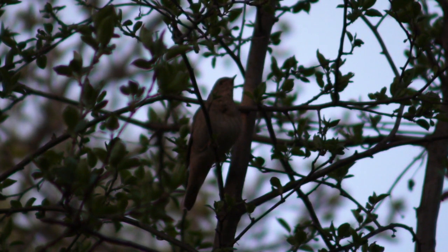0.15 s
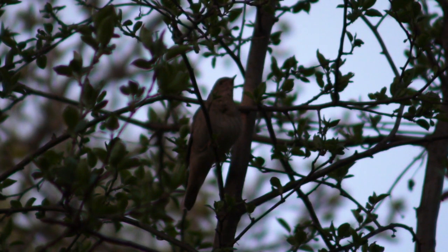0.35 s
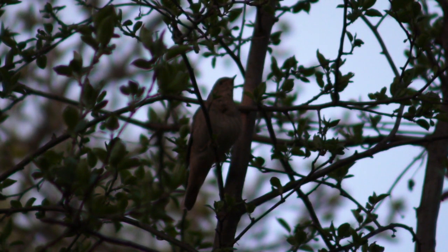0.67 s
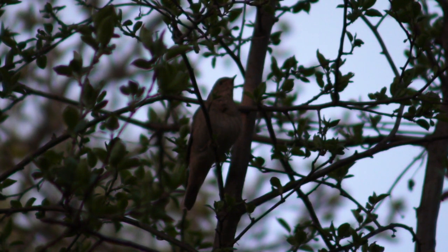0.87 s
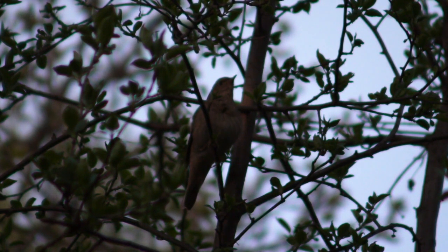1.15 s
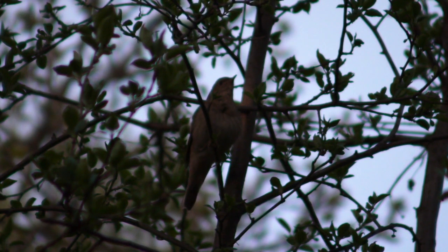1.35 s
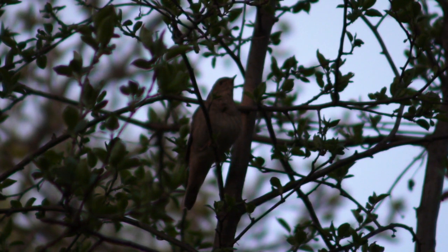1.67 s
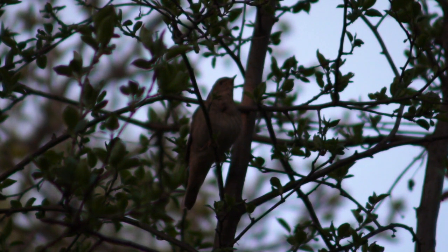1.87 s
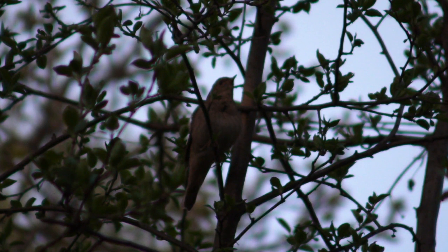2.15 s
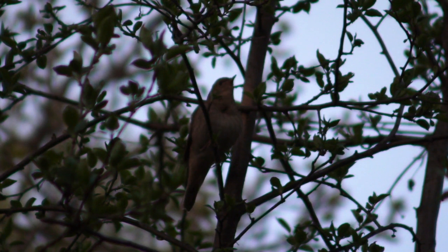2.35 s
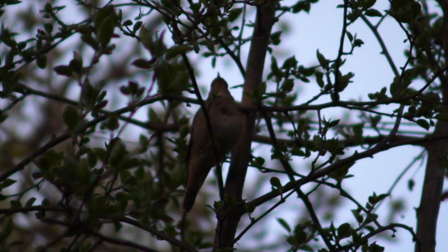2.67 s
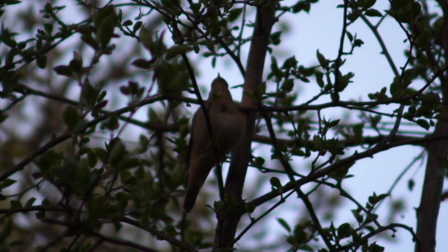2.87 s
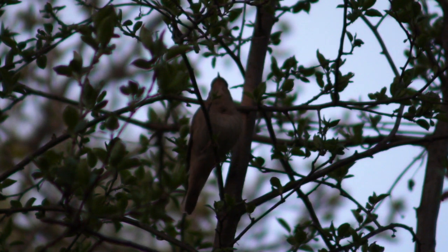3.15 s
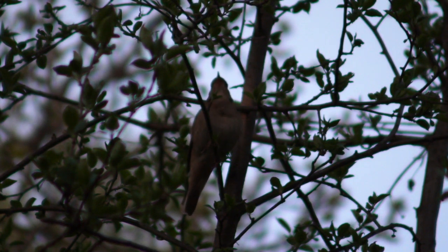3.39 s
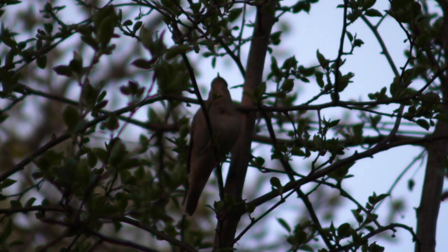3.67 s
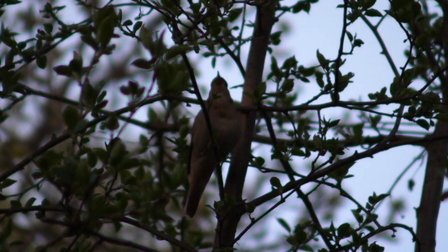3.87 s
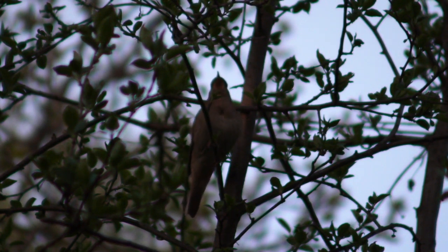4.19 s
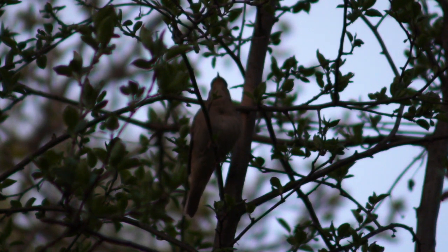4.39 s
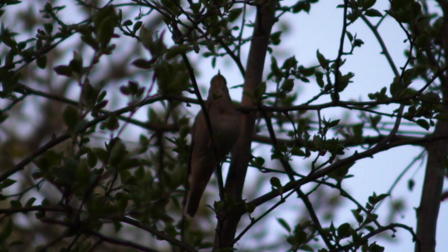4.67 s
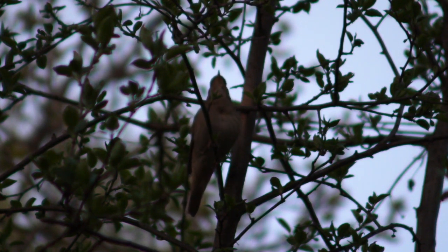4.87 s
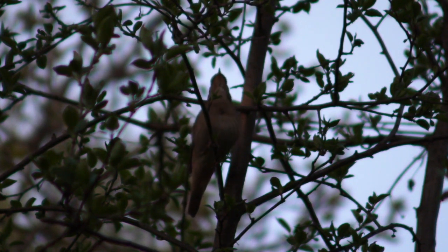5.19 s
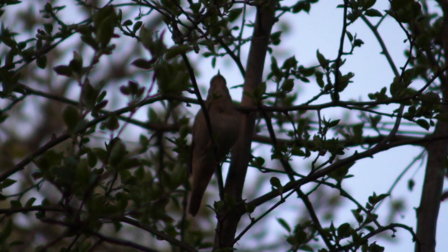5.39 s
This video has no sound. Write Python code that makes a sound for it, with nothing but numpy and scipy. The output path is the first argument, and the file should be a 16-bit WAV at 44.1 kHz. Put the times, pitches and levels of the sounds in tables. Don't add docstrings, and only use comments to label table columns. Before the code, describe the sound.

A continuous low road rumble, with soft wavering engine hums and slight tyre hiss, lies under an outdoor scene among leaves, growing slightly over five and a half seconds. For the first 2.4 seconds only distant birds are heard: faint scratchy chirps at the start and around 1.4, thin high ticking calls, and a hazy slurred, warbling song from 1.6. At 2.4 a close nightingale gives a short falling chip. Clear whistles around 3.2 kHz swell in at 2.7, 3.3 and 3.9, each bolder; the third is longest, briefly trembling before trailing off. Very quick sweeps from about 7 kHz down to 3 kHz follow at 3.0, 3.6 and 4.3. Then rich throbbing low notes near 1.9 kHz come in pairs at 4.6 and 5.1, capped by loud sweeps at 4.9 and 5.4. Every note has close leafy echoes and a short diffuse tail; loud notes duck the background.

```python
import sys
import numpy as np
from scipy import signal
from scipy.fft import rfft, irfft, next_fast_len
from scipy.io import wavfile
from scipy.ndimage import uniform_filter1d

SR = 44100
rng = np.random.default_rng(int(sys.argv[2]) if len(sys.argv) > 2 else 0)


def store_pcm(level_fs):
    pcm = np.round(np.clip(level_fs, -1, 1) * 32767).astype(np.int16)
    wavfile.write(sys.argv[1], SR, np.atleast_2d(pcm).T)


def volts_from_decibels(level):
    exponent = np.asarray(level, float) / 20
    return 10 ** exponent


N = 244314


def rms_one(x):
    return x / np.sqrt(np.mean(x ** 2) + 1e-20)


def at_hz(points, hz):
    points = np.array(points)
    return np.interp(np.log(hz + 1), np.log(points[:, 0]), points[:, 1])


def drift(rate):
    r = np.exp(-80 * np.pi * rate / SR)
    noise = rng.standard_normal(N // 40 + 2002)
    slow = signal.lfilter([1], [1, -2 * r, r * r], noise)[2000:]
    return np.interp(np.arange(N) / 40, np.arange(len(slow)), rms_one(slow))


# (start [s], stop [s], rate [1/s], pitch swing [Hz], level swing [dB])
WHISTLE_SHAKE = (4.025, 4.13, 66, 22, 8.4)
# (frequency [Hz], gain [dB])
BEAK_RESONANCE = [(3500, 5), (6500, -4.5), (8000, -6), (10500, 6), (12500, -7), (14500, -20.5),
                  (16000, -22)]


def sing(out, rows, tones, edge_s=0.00094, waver=np.zeros(N), steady=0):
    s, hz, level_db = np.transpose(rows)
    at = np.arange(int(max(s[0], 0) * SR), min(int(s[-1] * SR), N))
    t = at / SR
    start, stop, rate, swing_hz, swing_db = WHISTLE_SHAKE
    shake_depth = np.clip(np.minimum(t - start, stop - t) / 0.041, 0, 1)
    shake = np.sin(2 * np.pi * rate * (t - start)) * shake_depth

    pitch = uniform_filter1d(np.interp(t, s, hz), size=90)
    pitch = pitch * (1 + waver[at]) + swing_hz * shake
    phase = 2 * np.pi * np.cumsum(pitch) / SR
    level = uniform_filter1d(np.interp(t, s, level_db), size=260) + swing_db * shake

    wave = np.sin(phase)
    for k, db in tones:
        overtone_db = db + at_hz(BEAK_RESONANCE, k * pitch) + steady * (level.max() - level)
        audible = k * pitch < .45 * SR
        wave += volts_from_decibels(overtone_db) * np.sin(k * phase) * audible
    soft_ends = np.clip(np.minimum(t - s[0], s[-1] - t) / edge_s, 0, 1)
    out[at] += np.sqrt(2) * volts_from_decibels(level) * soft_ends * wave


def whistle(db, on, opens, lets_go, end, hz):
    lead_in_s, lead_in_db = 0.064, -48
    voice_on_s, voice_on_db = .018, -20
    soft_gain_db = 2
    open_s, open_db = .018, -3.5
    fade_db_per_s, cut_s, cut_db = 148, 0.0034, 9
    linger_db, linger_db_per_s = -20, 57
    glide_hz, glide_s = 205, 0.05
    sag_hz_per_db, sag_from_db = 14, -13

    t = np.arange(on - voice_on_s - lead_in_s, end + cut_s, .002)
    swell = np.interp(t, [t[0], on - voice_on_s, on, opens, opens + open_s, lets_go],
                      [lead_in_db - 16, lead_in_db, voice_on_db, voice_on_db + soft_gain_db,
                       db + open_db, db])
    since = t - lets_go
    fade = np.maximum(db - fade_db_per_s * since, linger_db - linger_db_per_s * since)
    level = np.minimum(swell, fade) - cut_db * np.clip((t - end) / cut_s, 0, 1)
    effort_db = uniform_filter1d(np.maximum(level - sag_from_db, 0), size=15)
    pitch = hz + glide_hz * np.exp((on - t) / glide_s) - sag_hz_per_db * effort_db
    return np.c_[t, pitch, uniform_filter1d(level, size=5)]


def low_note(start, end, hz, first_db, last_db):
    throb_s, throb_db, last_throb_s = 0.0257, 9, 0.014
    droop_hz, droop_s = 200, .014
    shy_db, shy_s = 7.5, 0.022
    t = np.arange(start, end, .001)
    throb = np.sin(np.pi * (end - last_throb_s - t) / throb_s) ** 2
    pitch = hz - droop_hz * np.exp((t - end) / droop_s)
    level = np.interp(t, [start, end], [first_db, last_db])
    level = level - throb_db * throb - shy_db * np.exp((start - t) / shy_s)
    return np.c_[t, pitch, level]


def sweep(s, top, end, bend, db):
    start_hz, rise_s, fade_db = 4760, 0.0069, -5.5
    fall_s = 0.031 + (top - end) / 180000
    share = np.linspace(0, 1, 16)
    pitch = top - (top - end) * share ** bend
    falling = np.c_[s + rise_s + fall_s * share, pitch, db + fade_db * share ** 1.5]
    return np.r_[[(s, start_hz, db - 4.0)], falling]


# (frequency [Hz], gain [dB])
LEAF_REFLECTION = [(1800, -2), (3300, -5.5), (5000, 5), (8000, -4), (12000, 5.5)]
# (frequency [Hz], share of tail length [1])
AIR_ABSORPTION = [(2000, 1.0), (5000, 0.71), (8000, 0.58), (12000, 0.5)]


def haze(onset_s, t60):
    t, hz = np.arange(SR) / SR, np.arange(SR // 2 + 1)
    white = rfft(rng.standard_normal((2, SR))) * volts_from_decibels(at_hz(LEAF_REFLECTION, hz))
    tail, edges = 0, [0, 4000, 8000, 11000, SR]
    for low, high in zip(edges, edges[1:]):
        share = np.clip(at_hz(AIR_ABSORPTION, low + 1000), .2, 2)
        band = irfft(white * (hz >= low) * (hz < high), SR)
        tail = tail + band * volts_from_decibels(-60 * t / t60 / share)
    swell = 1 - np.exp(-t / onset_s)
    return tail * swell / np.sqrt(np.sum((swell * volts_from_decibels(-60 * t / t60)) ** 2))


# (onset [s], decay time t60 [s], energy [dB])
SCATTERED_TAILS = [
    (0.001, 0.297, 1.5),
    (0.065, 1.103, -14.5),
]
# (delay [ms], left level [dB], right level [dB])
CLOSE_ECHOES = [(.8, -44, -16.5), (2.4, -13.5, -11.5), (3.7, -2.5, -9), (5.4, -14, -36), (6.5, -6.5, -2.5),
                (8.1, 0, -33.5)]
# (frequency [Hz], left-right difference [dB])
HOUSING_SHADE = [(1800, 1.5), (3200, -0.5), (4500, -1), (7000, -5), (11000, -4)]


def thicket():
    response = sum(volts_from_decibels(db) * haze(onset_s, t60) for onset_s, t60, db in SCATTERED_TAILS)
    response[:, 0] += 1
    for ms, left_db, right_db in CLOSE_ECHOES:
        response[:, round(ms * SR / 1000)] += volts_from_decibels(np.array([left_db, right_db]))
    side_db = at_hz(HOUSING_SHADE, np.arange(129) * SR / 256)
    shade = np.roll(irfft(volts_from_decibels(np.outer([.5, -.5], side_db))), 128, axis=1)
    return signal.fftconvolve(response, shade, axes=1)[:, 128:]


def scatter(x, response):
    return signal.fftconvolve(x[None], response, axes=1)[:, :N]


# (voice on [s], opens [s], lets go [s], end [s], settled pitch [Hz])
HIGH_WHISTLES = [
    (2.686, 2.768, 2.808, 2.866, 3196),
    (3.324, 3.387, 3.445, 3.515, 3194),
    (3.91, 3.936, 4.015, 4.26, 3137),
]
# (start [s], end [s], pitch [Hz], first level [dB], last level [dB])
THROBBING_NOTES = [
    (4.574, 4.665, 1849, -25.5, -11),
    (4.687, 4.762, 1880, -7, -18.5),
    (5.127, 5.221, 1886, -15, -8.5),
    (5.243, 5.301, 1880, -22, -7.5),
]
# (time [s], pitch [Hz], level [dB])
OPENING_CHIP = [(2.41, 5220, -38), (2.417, 5150, -31.5), (2.429, 4570, -18.5), (2.439, 4120, -25.5),
                (2.446, 3820, -27)]
# (time [s], top [Hz], end [Hz], bend [1], level [dB])
FALLING_SWEEPS = [(3.0389, 7200, 3360, 1.58, -13.5), (3.628, 7020, 3140, 1.96, -9.5),
                  (4.287, 7580, 2967, 1.37, -8.5), (4.861, 7564, 2740, 1.35, -7.5),
                  (5.41, 7700, 2840, 1.2, -8)]
# (multiple [1], level re fundamental [dB])
WHISTLE_OVERTONES = [(2, -32.5), (3, -37), (4, -45.5), (5, -44.5)]
LOW_OVERTONES = [(2, -39.5), (3, -45), (4, -52), (5, -41), (6, -32), (7, -33.5), (8, -25)]
CHIP_OVERTONES = [(2, -26)]
SWEEP_OVERTONES = [(2, -18.5), (3, -46)]


def nightingale():
    out = np.zeros(N)
    unsteady = drift(45)
    for k, row in enumerate(HIGH_WHISTLES):
        full_db = -11.5 + 3 * k
        sing(out, whistle(full_db, *row), WHISTLE_OVERTONES, 0.018, 0.0039 * unsteady, steady=-0.16)
    for row in THROBBING_NOTES:
        sing(out, low_note(*row), LOW_OVERTONES, 0.0086, 0.011 * unsteady, steady=0.32)
    sing(out, OPENING_CHIP, CHIP_OVERTONES, edge_s=0.0044)
    for row in FALLING_SWEEPS:
        sing(out, sweep(*row), SWEEP_OVERTONES, edge_s=0.004)
    return scatter(out, thicket())


# (time [s], length [s], first pitch [Hz], last pitch [Hz], peak level [dB])
THRUSH_SLURS = [
    (1.56, 0.39, 2184, 1927, -49.5),
    (2.08, 0.17, 1884, 1810, -45),
    (2.195, 0.16, 1963, 2004, -40.5),
    (2.76, 0.25, 3465, 3480, -39.5),
]
# (time [s], length [s], middle pitch [Hz], swing [Hz], peak level [dB])
THRUSH_WARBLES = [
    (1.885, 0.16, 2397, 330, -41.5),
    (2.614, 0.12, 1965, 200, -45),
]


def far_thrush():
    song, share = np.zeros(N), np.linspace(0, 1, 40)
    swell_db = 7 * (np.sin(np.pi * share) - 1)
    unsteady = drift(60)
    for s, length, first, last, db in THRUSH_SLURS:
        pitch = last + (first - last) * (1 - share) ** 1.5
        rows = np.c_[s + length * share, pitch, db + swell_db]
        sing(song, rows, [], edge_s=0.01, waver=0.0043 * unsteady)
    for s, length, hz, swing_hz, db in THRUSH_WARBLES:
        pitch = hz + swing_hz * np.cos(2 * np.pi * 15 * length * share)
        rows = np.c_[s + length * share, pitch, db + swell_db]
        sing(song, rows, [], edge_s=0.0047, waver=0.0502 * unsteady)
    return song


# (time [s], length [s], low edge [Hz], high edge [Hz], level [dB])
RASPS = [(0.034, 0.056, 3300, 5930, -45.5), (0.102, 0.11, 2200, 2680, -44), (0.232, 0.035, 2500, 3600, -44),
         (1.352, 0.052, 3460, 5600, -46), (1.6, 0.041, 2700, 4600, -49)]


def add_rasps(song):
    for s, length, low, high, db in RASPS:
        at = int(s * SR) + np.arange(SR // 10)
        t = at / SR - s
        swell = np.sin(np.pi * np.clip(t / length, 0, 1))
        buzz = rng.standard_normal(len(at)) * (1 + np.sin(2 * np.pi * 95 * t)) * swell
        band = signal.butter(2, [low, high], "band", fs=SR, output="sos")
        song[at] += volts_from_decibels(db + 2) * signal.sosfilt(band, buzz)


# (time [s], peak level [dB], upper tone [Hz], left-right difference [dB])
THIN_CALLS = [(0.0528, -43, 6490, -8), (0.3471, -48.5, 6380, -6), (0.7487, -51.5, 6380, -2),
              (1.0415, -53.5, 6390, -10), (1.1218, -45, 6560, -10), (1.249, -49.5, 6400, -4),
              (1.3673, -41.5, 6480, -8), (1.6013, -42, 6550, -5), (2.3697, -52, 6350, -1.5),
              (2.5062, -56, 6250, -19.5), (2.7556, -48, 6410, -1), (2.8544, -48.5, 6430, -0.5),
              (2.9407, -48, 6460, -2)]


def far_birds():
    out, song = np.zeros((2, N)), far_thrush()
    far = volts_from_decibels(-7.5) * haze(0.0044, 0.84)
    far[:, 0] += .5
    for s, db, hz, pan in THIN_CALLS:
        call = np.zeros(N)
        lower_db = -46 + 0.3 * (db + 38.5)
        for tone, tone_db in ((hz, db + 1.5), (hz * .655, lower_db)):
            flick = [(s - .005, .93 * tone, tone_db - 8.5), (s + .007, 1.01 * tone, tone_db),
                     (s + .075, .99 * tone, tone_db - 9)]
            sing(call, flick, [], edge_s=0.0061)
        out += call * volts_from_decibels(np.array([[pan / 2], [-pan / 2]]))
    add_rasps(song)
    calls = signal.fftconvolve(out, far, axes=1)[:, :N]
    return calls + scatter(song, 1.3 * far + volts_from_decibels(5.0) * haze(0.014, .5))


# (nearest [s], firing rate then [Hz], gain [Hz/s], level [dB], time to recede [s])
PASSING_ENGINES = [(0.46, 108, 9, -37.5, 1.17), (2.5, 123, 4, -39.5, 0.88), (4.6, 148, 5, -44.5, 0.71),
                   (.2, 63, 9.3, -38.5, 0.58), (1.95, 66, 4, -35.5, .3), (4.3, 56.5, 5, -32, 0.43),
                   (5.45, 62, 3, -33, .2), (4.15, 228.5, 0.11, -48, 1.1), (.9, 400, 30, -43.5, 0.49),
                   (4.8, 405, 45, -47.5, .6), (2.8, 445, 10, -42.5, 0.9)]


def engines():
    out, t = 0, np.arange(N) / SR
    for s, hz, gain_hz, db, recede in PASSING_ENGINES:
        pitch = (hz + gain_hz * (t - s)) * (1 + 0.02495 * drift(5.99))
        near = 1 / (1 + ((t - s) / recede) ** 4) ** .5
        level = np.sqrt(2) * near * volts_from_decibels(db + 2.2 * drift(7))
        out = out + level * np.sin(2 * np.pi * np.cumsum(pitch) / SR)
    return out


# (frequency [Hz], spectral density [dB])
ROAR_SPECTRUM = [(12, -53.5), (20, -20.5), (81, -1), (230, -12), (313, -9.5), (391, -10), (725, -14.5),
                 (1070, -12.5), (1170, -15), (1460, -20), (2950, -32), (4130, -35.5), (6840, -42),
                 (14600, -46), (16300, -42)]
# (frequency [Hz], left-right likeness [1])
ROAR_COHERENCE = [(40, 1), (120, 0.96), (250, 0.96), (500, 0.95), (1000, 0.74), (3100, 0.068),
                  (15000, 0.067)]


def city():
    size = next_fast_len(N)
    hz = np.arange(size // 2 + 1) * SR / size
    alike = np.clip(at_hz(ROAR_COHERENCE, hz), 0, 1)
    mid, side = rfft(rng.standard_normal((2, size))) * volts_from_decibels(at_hz(ROAR_SPECTRUM, hz))
    pair = np.sqrt(1 + alike) * mid + np.sqrt(1 - alike) * side * [[1], [-1]]
    reference = irfft(pair * (hz > 200) * (hz < 1300), size)
    scale = np.sqrt(np.mean(reference ** 2))
    out, edges, together = 0, [0, 150, 400, 1000, 2800, SR], drift(1.5)
    for low, high in zip(edges, edges[1:]):
        depth_db = .9 if high < SR else .3
        band = irfft(pair * (hz >= low) * (hz < high), size)[:, :N]
        out = out + band * volts_from_decibels(depth_db * (0.98 * together + drift(5)))
    level_db = 1.0 - 38 + 0.405 * np.arange(N) / SR
    return out / scale * volts_from_decibels(level_db)


def scene():
    roar_lag, engine_lag = 7, 13
    song = nightingale() + far_birds()
    roar, hum = city(), engines()
    left = np.roll(roar[0], roar_lag) + np.roll(hum, engine_lag)
    return song + np.array([left, roar[1] + hum])


def low_pass(x):
    return signal.sosfilt(signal.butter(12, 16470, fs=SR, output="sos"), x)


def record(dry):
    limit_db, release_db_s, attack_s = -4, 111, 0.00033
    peak_db = 20 * np.log10(np.abs(dry).max(axis=0) + 1e-9)
    over_db = np.maximum(peak_db - limit_db, 0)
    ramp = release_db_s * np.arange(N) / SR
    held_db = np.maximum.accumulate(over_db + ramp) - ramp
    r = np.exp(-1 / (attack_s * SR))
    duck_db = signal.lfilter([1 - r], [1, -r], held_db)
    duck_db = np.roll(duck_db, -SR // 1000)
    dry = signal.sosfilt(signal.cheby1(6, 1, 15500, fs=SR, output="sos"), dry)
    return low_pass(dry * volts_from_decibels(-duck_db))


dry = scene()
out = record(dry)
store_pcm(out)
```